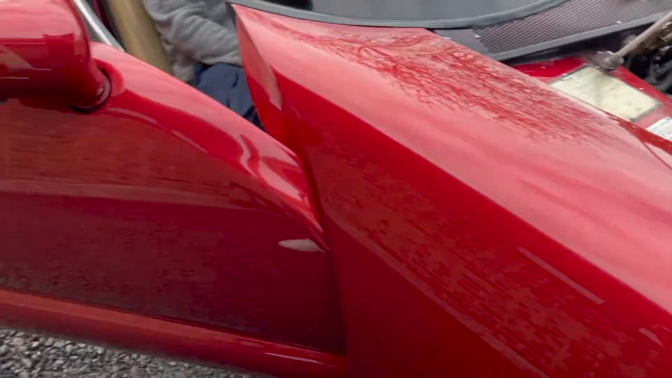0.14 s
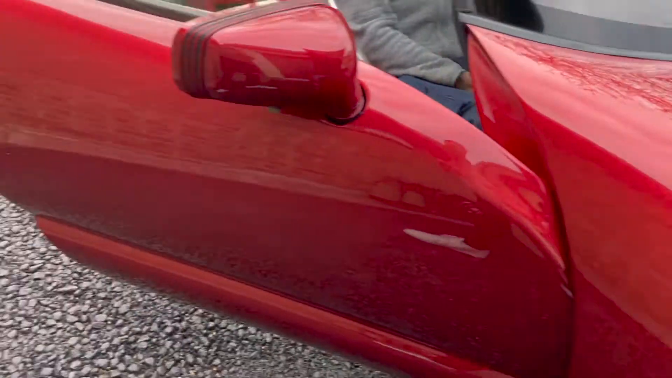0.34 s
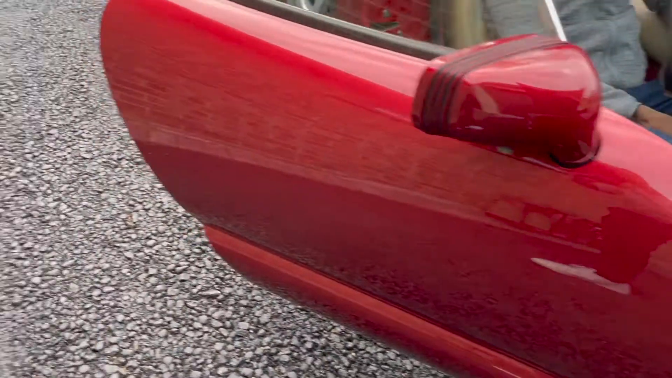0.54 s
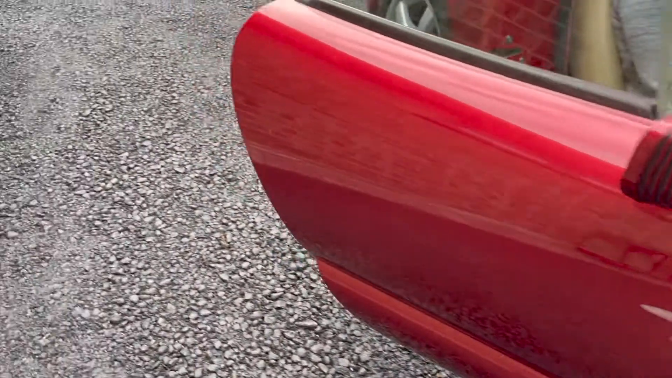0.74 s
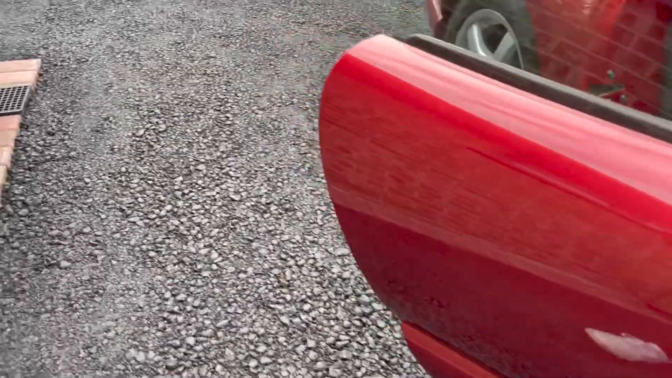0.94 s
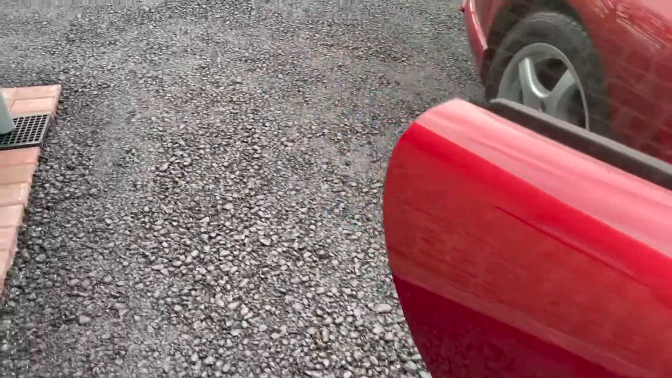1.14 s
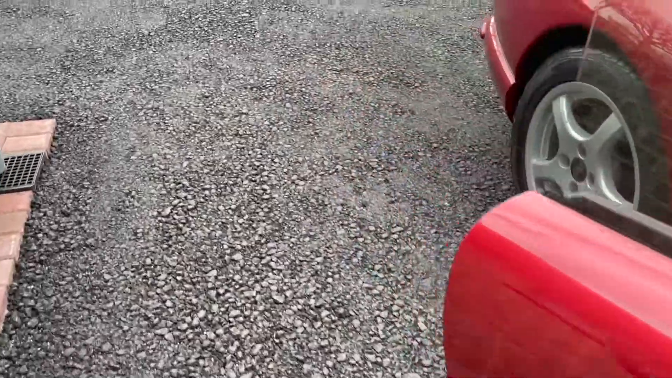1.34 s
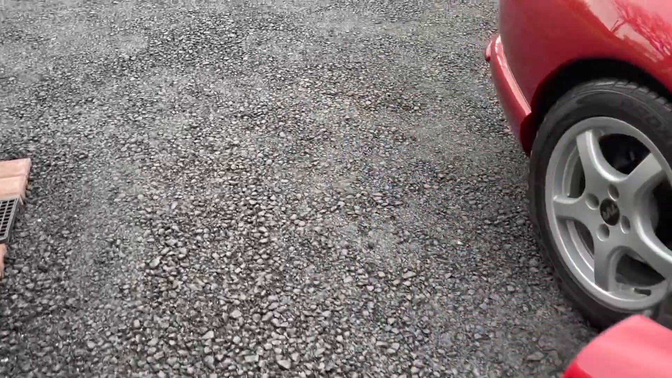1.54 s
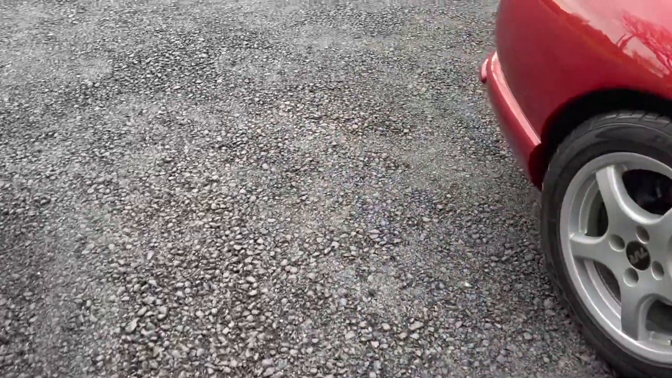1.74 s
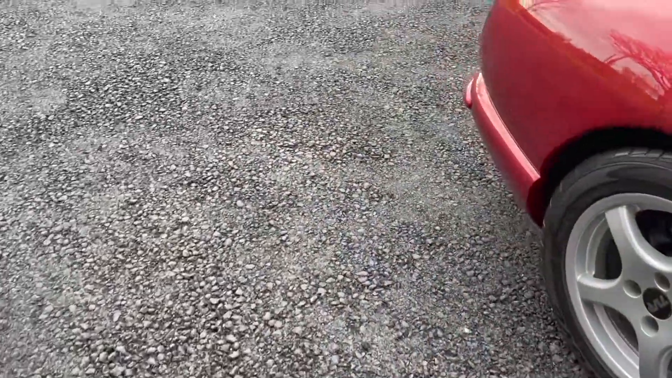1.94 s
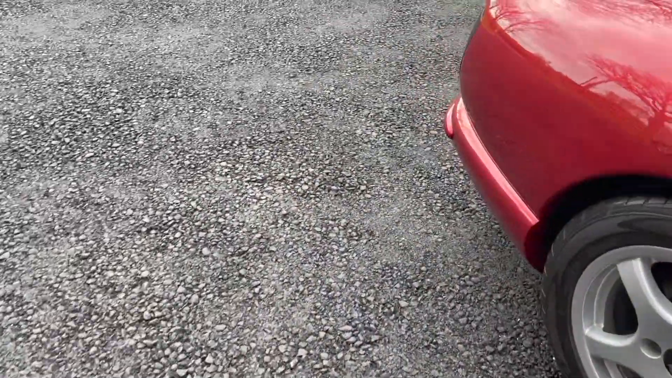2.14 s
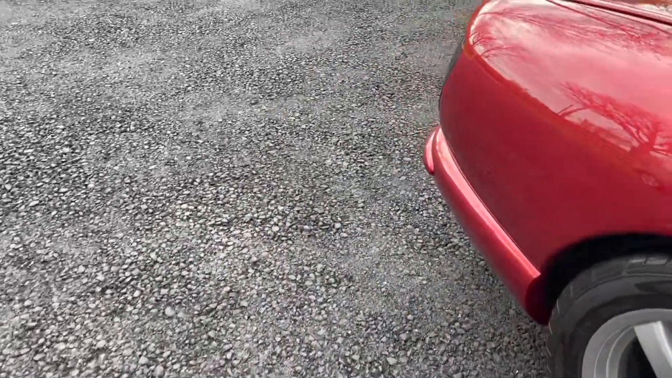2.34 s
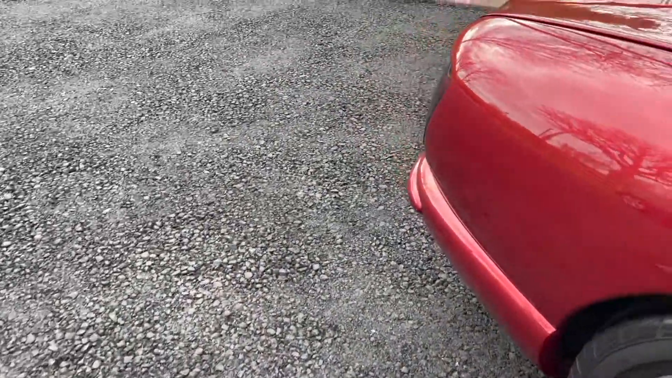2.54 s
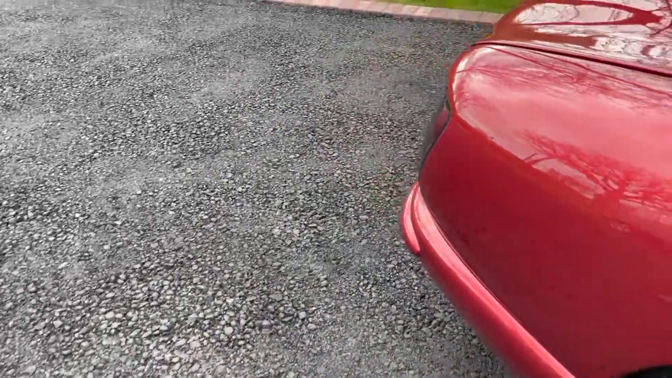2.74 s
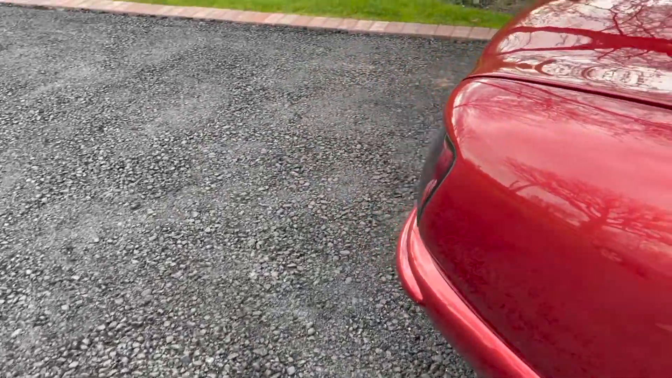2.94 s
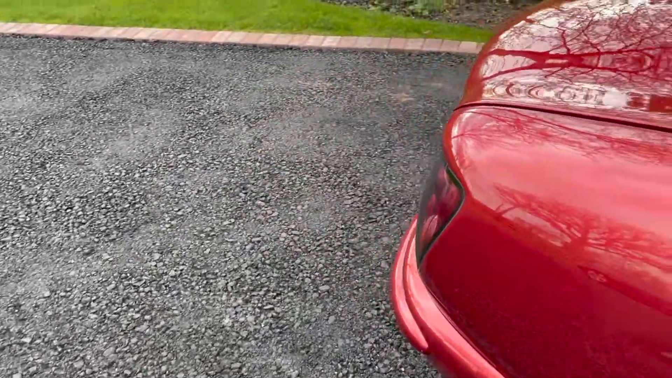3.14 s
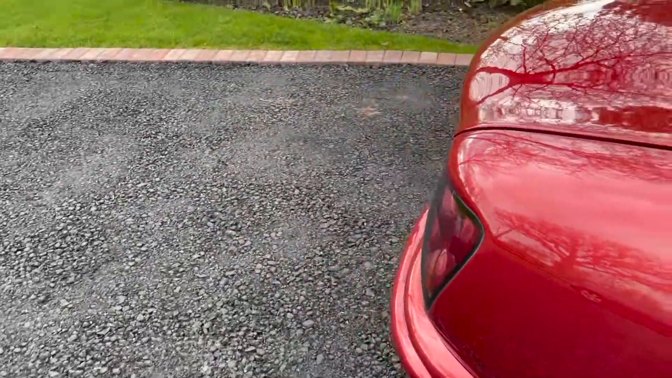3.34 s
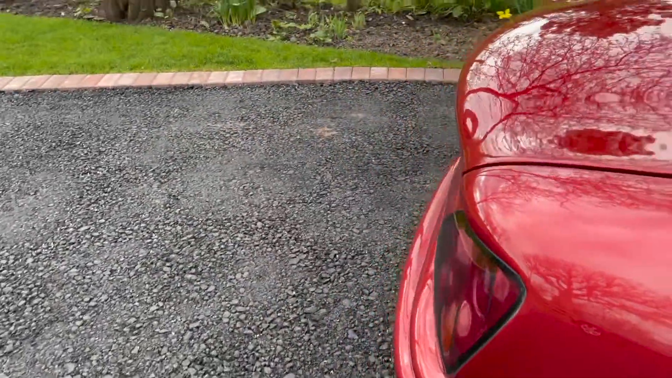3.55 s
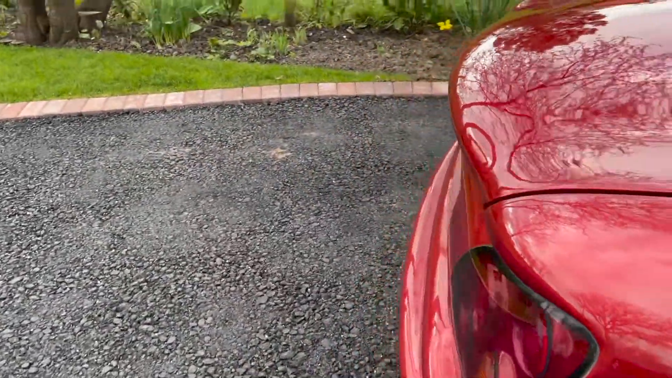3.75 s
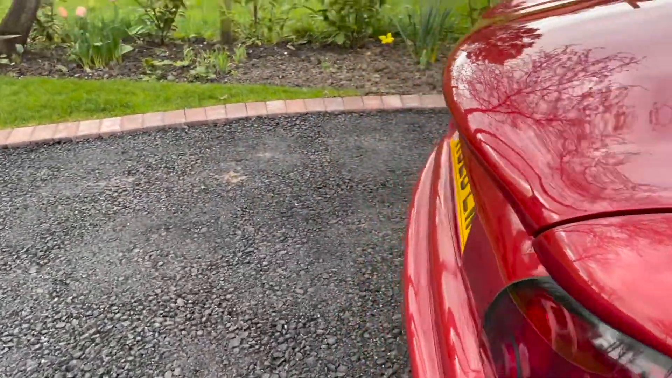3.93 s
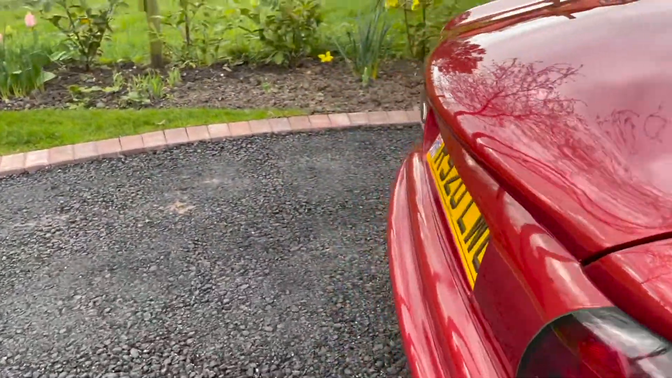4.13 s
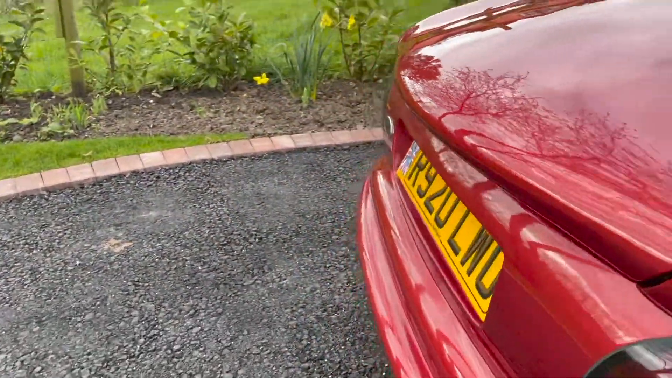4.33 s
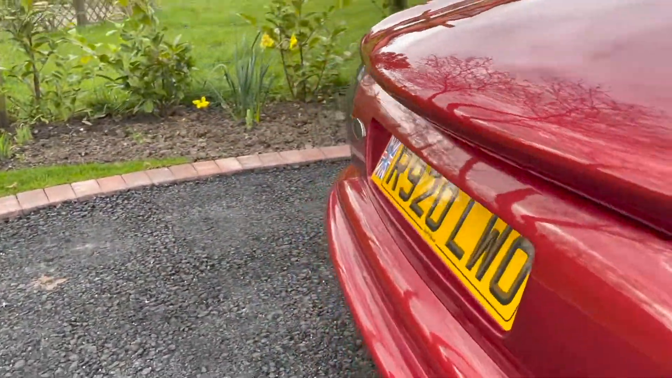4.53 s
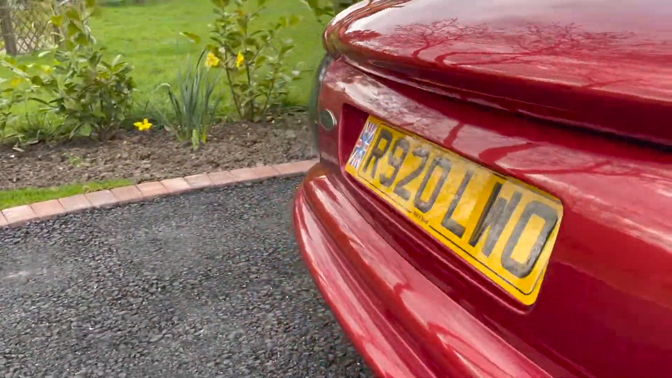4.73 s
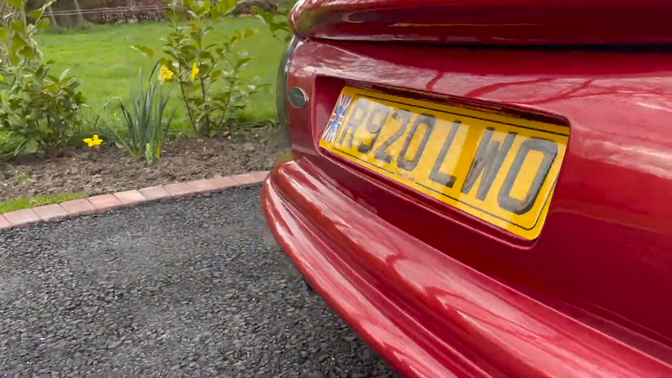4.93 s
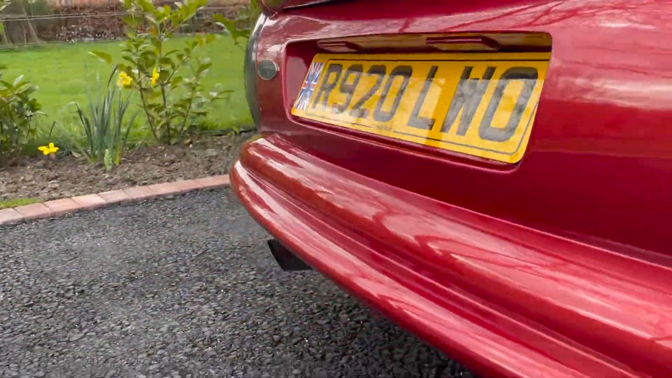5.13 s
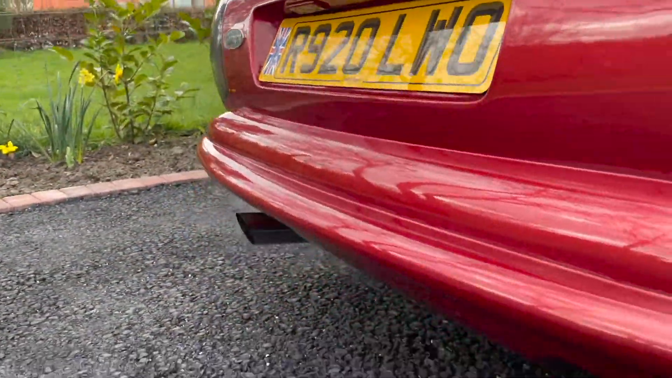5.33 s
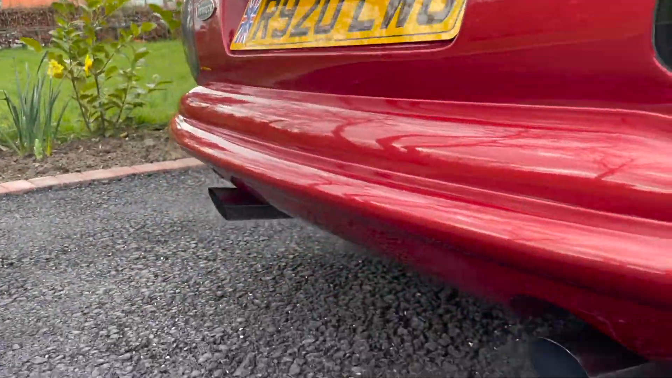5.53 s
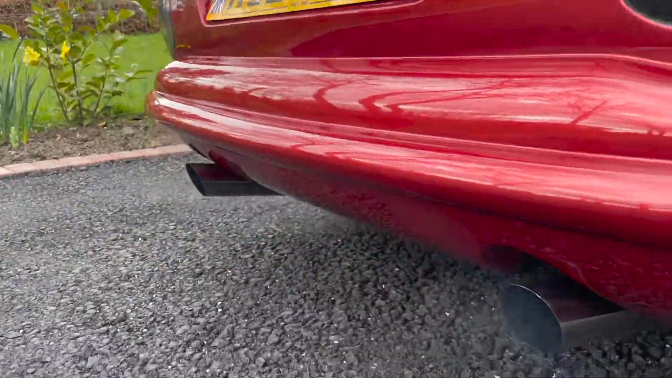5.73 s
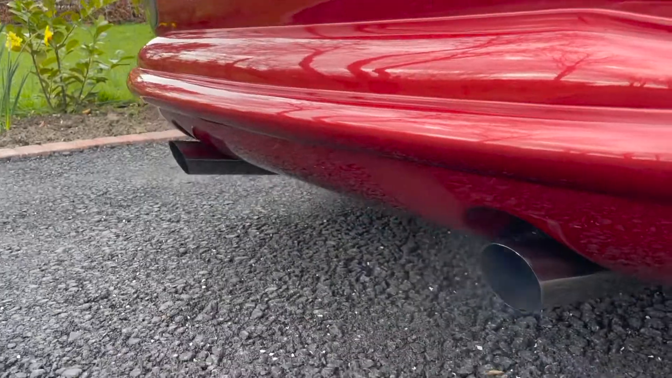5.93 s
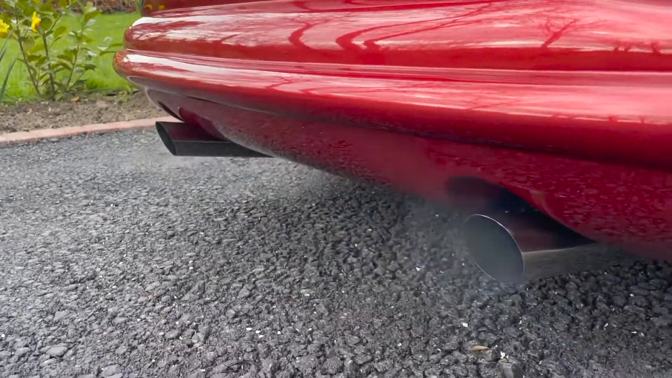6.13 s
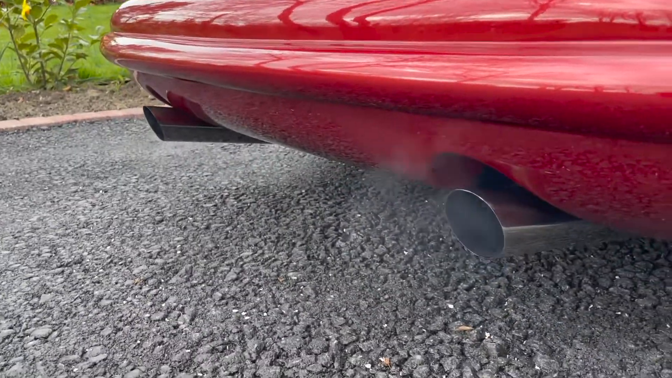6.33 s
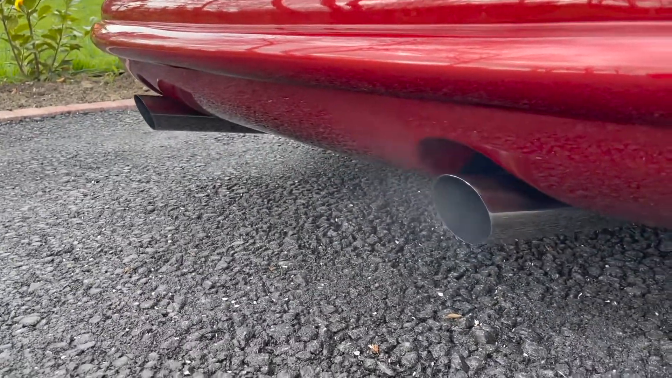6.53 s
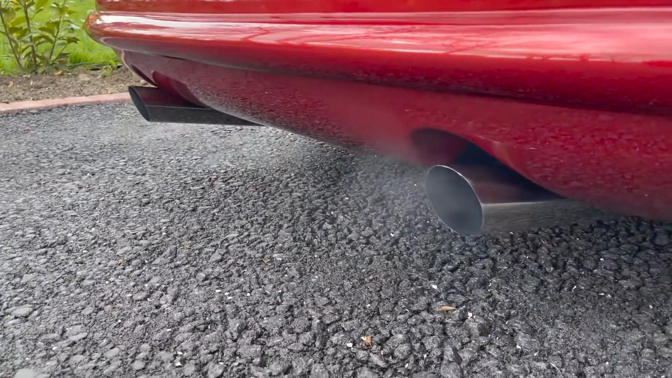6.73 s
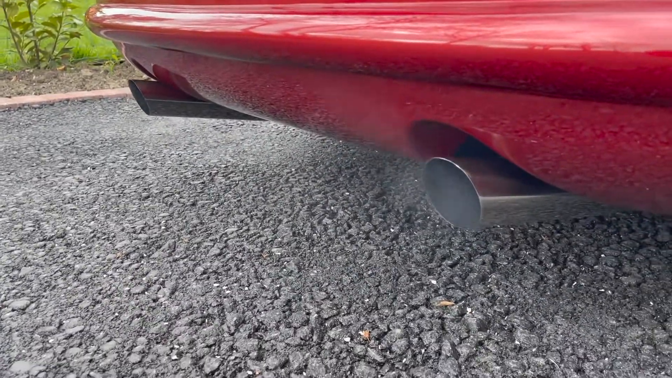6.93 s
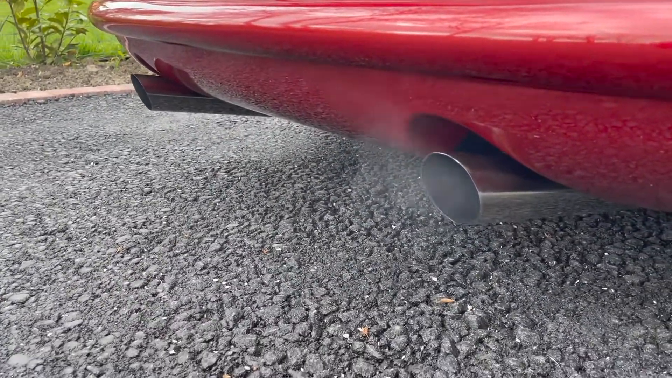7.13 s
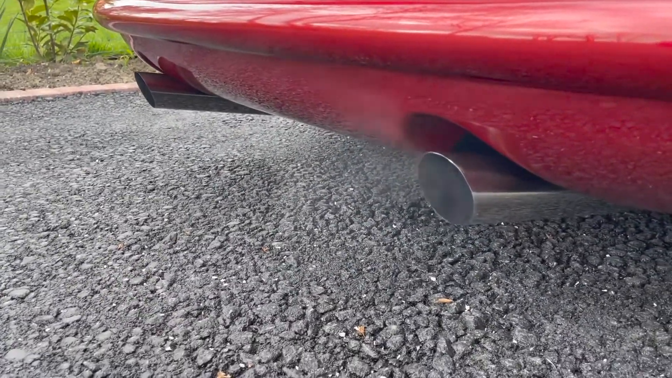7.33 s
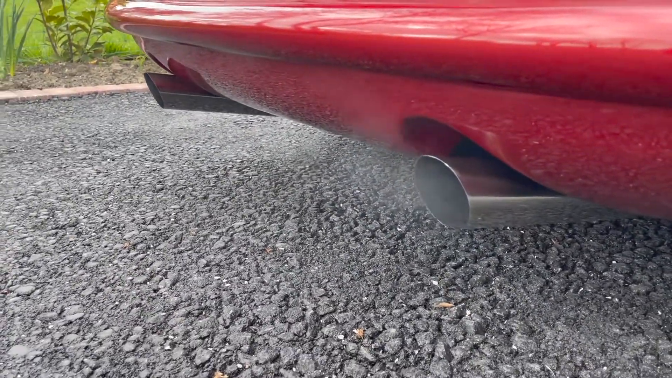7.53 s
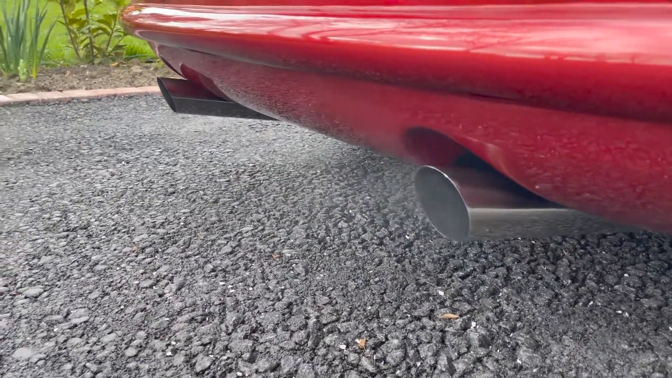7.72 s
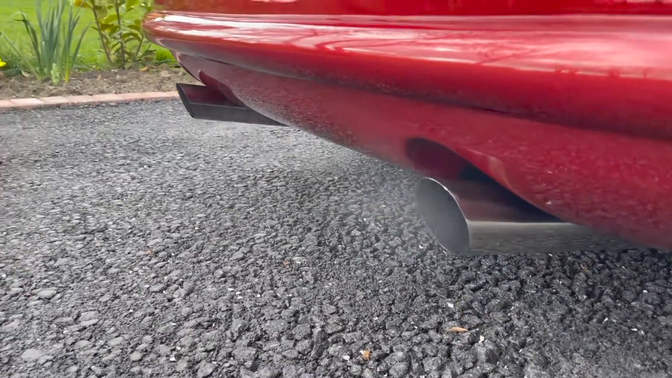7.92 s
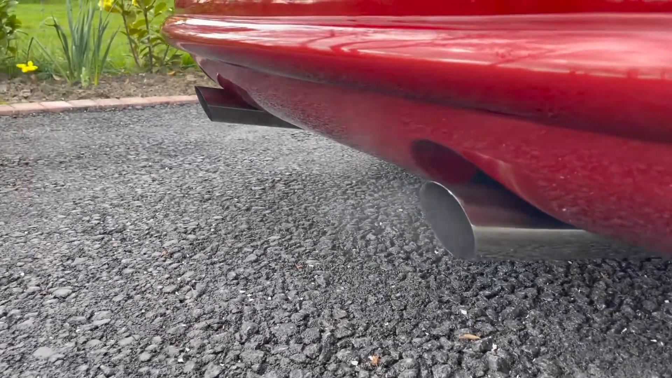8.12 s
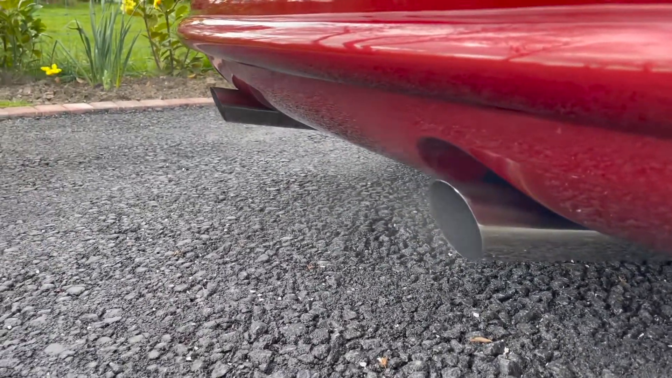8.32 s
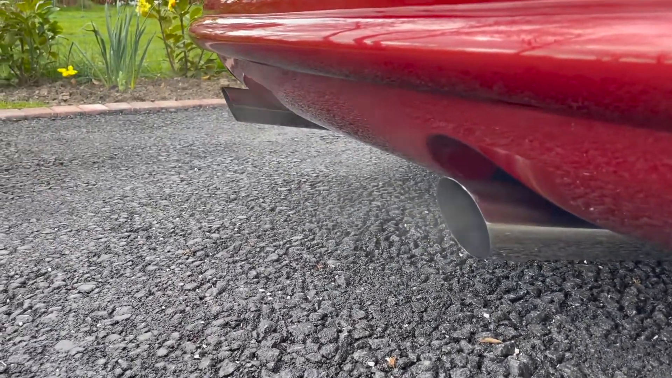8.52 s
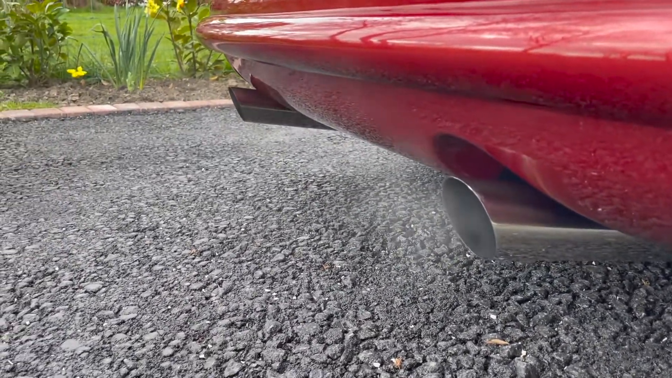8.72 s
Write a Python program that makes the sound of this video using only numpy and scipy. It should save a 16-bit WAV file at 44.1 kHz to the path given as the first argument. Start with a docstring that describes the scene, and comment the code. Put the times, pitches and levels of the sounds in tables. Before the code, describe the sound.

A big V8 idles fast and lumpy, its engine hiss fading as the deep exhaust burble grows louder and closer.

```python
"""On a drive, a V8 idles fast and lumpy while the listener walks from the open engine bay along the
flank to the tailpipes. Belts, fan and valve gear hiss and tick under ringing covers, fading as the
exhaust burble grows; grit crunches underfoot midway. The burble comes from eight cylinders of unequal
strength and lag, whose pulses shake the panels, blow the open pipes and ring the silencer chambers."""
import sys
import numpy as np
from scipy import signal
from scipy.fft import rfft, irfft, next_fast_len
from scipy.io import wavfile
from scipy.ndimage import uniform_filter1d, minimum_filter1d

SR = 44100
rng = np.random.default_rng(int(sys.argv[2]) if len(sys.argv) > 2 else 0)


def output_pcm(signal):
    """Save a mono or channel-first signal as 16-bit PCM at the path in sys.argv[1].

    Samples are clipped to [-1, 1] before scaling.
    """
    pcm = np.clip(np.atleast_2d(signal).T, -1, 1) * 32767
    wavfile.write(sys.argv[1], SR, np.round(pcm).astype(np.int16))


N = 391166
PADDED = next_fast_len(N)   # length of the frequency-domain filters
TIME = np.arange(N) / SR


def from_db(db):
    """Decibels to gain."""
    return 10 ** (np.asarray(db) / 20)


def rms_one(x):
    """Scaled to unit power."""
    return x / np.sqrt(np.mean(x ** 2) + 1e-20)


def in_time(rows):
    """Each column of an automation table, per sample."""
    seconds, *columns = np.transpose(rows)
    return [np.interp(TIME, seconds, c) for c in columns]


def over_hz(rows):
    """Each column of a spectrum table, per frequency bin."""
    hz, *columns = np.transpose(rows)
    bin_hz = np.arange(1, PADDED // 2 + 2) * SR / PADDED
    return [np.interp(np.log(bin_hz), np.log(hz), c) for c in columns]


def drift(rate_hz):
    """A slow random wander of spread 1, drawn at every 40th sample."""
    r = np.exp(-80 * np.pi * rate_hz / SR)
    slow = signal.lfilter([1], [1, -2 * r, r * r], rng.standard_normal(N // 40 + 2002))[2000:]
    return np.interp(np.arange(N) / 40, np.arange(len(slow)), rms_one(slow))


def noise(spectrum):
    """Two unrelated noises of the given colour."""
    white = rfft(rng.standard_normal((2, PADDED)))
    return rms_one(irfft(white * from_db(over_hz(spectrum)[0]), PADDED)[:, :N])


def resonate(x, hz, width_hz):
    """One resonance with gain 1 at its peak."""
    r = np.exp(-np.pi * width_hz / SR)
    feedback = [1, -2 * r * np.cos(2 * np.pi * hz / SR), r * r]
    return signal.lfilter([(1 - r * r) / 2, 0, (r * r - 1) / 2], feedback, x)


def ring(x, hz, width_hz, skirt_hz=None):
    """A resonance at unit power, its skirts steepened by a second, wider one."""
    return rms_one(resonate(resonate(x, hz, width_hz), hz, skirt_hz or 2 * width_hz))


def modes(x, table, waver_db=0.0, sign=-1):
    """Parallel rings, by default alternating in sign; each may swell and fade on its own."""
    rings = [sign ** k * from_db(db) * ring(x, hz, width) for k, (hz, width, db) in enumerate(table)]
    return rms_one(sum(r * from_db(waver_db * drift(0.89)) if waver_db else r for r in rings))


def flecks(per_s, table):
    """Uneven ticks, each ringing a single resonance of the table."""
    ticks = (rng.random(N) < per_s / SR) * rng.standard_normal(N) + .02 * rng.standard_normal(N)
    dealt = rng.integers(0, len(table), N)
    return rms_one(sum(from_db(db) * ring(ticks * (dealt == k), hz, width)
                       for k, (hz, width, db) in enumerate(table)))


def puffs(pulses, fall_ms):
    """Gas flow after each firing: a quick rise, a slower fall."""
    r = np.exp(-1000 / (fall_ms * SR))
    return rms_one(signal.lfilter([1], [1, -2 * r, r * r], pulses))


# The rumble's colour. Each row: frequency in Hz, relative level in dB.
RUMBLE_COLOUR = [(12, -20), (20, -5), (30, -5), (42, 0), (62, 0), (80, -6), (100, -9), (140, -60)]
# Its fader. Each row: time in seconds, level in dB.
RUMBLE_FADER = [(0.0, -34), (1.6, -47), (2.9, -35), (5.2, -31.5), (8.87, -34)]

def rumble():
    """A bed of deep noise that heaves at random."""
    return from_db(in_time(RUMBLE_FADER)[0] + 2.0 * drift(3.0)) * noise(RUMBLE_COLOUR)


# The hum's band. Its row: pitch in Hz, width in Hz, relative level in dB.
HUM_BAND = [(595, 53, 0)]
# Its fader. Each row: time in seconds, level in dB.
HUM_FADER = [(0, -46), (.45, -50), (.7, -43), (1.7, -44), (2.2, -49), (4.6, -52.5), (5.4, -46.5),
             (8.87, -48.5)]

def bay_hum():
    """A narrow band of noise hums in the bay."""
    return from_db(in_time(HUM_FADER)[0]) * modes(rng.standard_normal((2, N)), HUM_BAND)


# Shoe drags. Each row: centre in seconds, spread in seconds, level in dB.
SCUFFS = [(3.78, 0.16, -46), (4.05, 0.088, -58), (4.33, 0.12, -49)]

def scuff():
    """Small stones grind under the sole: short bright rings that swell and fade."""
    strokes = sum(from_db(db) * np.exp(-.5 * ((TIME - s) / spread) ** 2) for s, spread, db in SCUFFS)
    stones = [(hz, 250.0, 0) for hz in np.geomspace(2800, 7000, 8)]
    return strokes * flecks(per_s=600 * from_db(5.0 * drift(10.0)), table=stones)


# Stones underfoot. Each row: start in seconds, peak before panning in dB, pitch in Hz.
STONE_CRACKS = [(2.931, -29, 900), (3.697, -31, 700), (3.936, -28, 750), (4.023, -22, 640),
                (4.044, -25, 880), (4.066, -21, 560)]

def grit():
    """Each stone cracks: a sharp tick and a short dull ring."""
    out = np.zeros(N)
    click = signal.unit_impulse(SR // 40)
    for start, peak_db, hz in STONE_CRACKS:
        crack = ring(click, hz, 320.0, 1200.0) + .3 * ring(click, 1700.0, 1200.0, 1500.0)
        at = round(start * SR)
        out[at:at + len(click)] += from_db(peak_db) * crack / np.abs(crack).max()
    return out


# Valve cover rings. Each row: pitch in Hz, width in Hz, relative level in dB.
VALVE_COVERS = [(2050, 90, -4), (2250, 90, -5), (2500, 120, -6), (2750, 100, -4), (2950, 100, 0),
                (3120, 100, 0), (3400, 160, -5)]
# The rasp's fader. Each row: time in seconds, level in dB.
RASP_FADER = [(0, -36), (.2, -43), (.4, -45), (1.0, -47.5), (2.5, -48), (3.2, -69), (4.5, -59.5),
              (6.4, -57), (8.87, -55)]

def valve_rasp(crank):
    """Valve gear ticks against its covers, bunching up once an engine cycle."""
    ticks_per_s = 800 * from_db(4.0 * np.cos(2 * np.pi * (crank - .65)))
    return from_db(in_time(RASP_FADER)[0]) * flecks(ticks_per_s, VALVE_COVERS)


# The hiss and its airy top. Each row: frequency in Hz, relative level in dB.
HISS_COLOUR = [(300, -29.5), (700, 3), (1300, -5), (2000, -5.5), (3000, -6.5), (4500, -5.5), (6500, -8.5),
               (8000, -20.5), (10000, -11), (12500, -18)]
HISS_AIR = [(14000, -21), (16000, -19)]
# Engine cover rings. Each row: pitch in Hz, width in Hz, relative level in dB.
BAY_COVERS = [(1150, 25, -14), (1400, 95, -9), (1600, 90, -11), (1715, 40, -13), (2200, 22, -14),
              (2640, 70, -12), (2990, 450, -1), (3170, 60, -14), (3500, 200, -8), (3780, 70, -12),
              (5000, 500, -11)]
# Brightness along the walk. Each row: time in seconds, lift of the top band in dB.
TREBLE_LIFT = [(0, 6.5), (1.3, 3.5), (2.8, 3), (4.3, 5), (5.2, 1.5), (8.87, 2)]

def engine_bay(crank, pulses):
    """Belts, fan and valve gear hiss in ringing covers; bands flicker, the upper ones swell each cycle."""
    tappets = (rng.random(N) < 100 / SR) * rng.standard_normal(N)
    shaking = rng.standard_normal((2, N)) + 0.41 * rms_one(tappets)
    hiss = noise(HISS_COLOUR + HISS_AIR)
    hiss += from_db(-4.0) * modes(shaking, BAY_COVERS, waver_db=1.3, sign=1)
    swell_db = 0.41 * np.cos(2 * np.pi * (crank - .65)) + 0.93 * drift(10.0)
    treble_db = in_time(TREBLE_LIFT)[0]
    out, edges_hz = 0, [200, 1400, 2800, 5600, 8500, 19500]
    for k, band_hz in enumerate(zip(edges_hz, edges_hz[1:])):
        band = signal.sosfilt(signal.butter(2, band_hz, "band", fs=SR, output="sos"), hiss)
        band_db = swell_db * min(k / 2, 1) + .5 * drift(15.0) + treble_db * max(k - 2, 0) / 2
        out = out + (-1) ** k * band * from_db(band_db)
    return rms_one(out * (1 + 0.045 * puffs(pulses, fall_ms=1.8)))


# Open pipe overtones. Each row: pitch in Hz, width in Hz, relative level in dB.
PIPE_OVERTONES = [(315, 20, -2), (367, 16, -4), (408, 26, -2), (465, 18, -5), (555, 20, -12),
                  (760, 20, -16), (830, 40, -12), (890, 25, -13), (945, 30, -13), (1042, 40, -15)]
# The colour of rushing gas. Each row: frequency in Hz, relative level in dB.
RUSH_COLOUR = [(170, -21), (250, -20), (350, -21), (520, -15.5), (700, -19), (900, -19), (1200, -33),
               (1700, -30), (2500, -61)]

def gas_flow(pulses, mouth_db, bay_db):
    """Pulses and turbulence blow the open pipes; gas rushes out of them and into the engine."""
    flow = 1 + 0.1 * puffs(pulses, fall_ms=1.5)
    blown = rms_one(pulses) + 1.1 * rms_one(rng.standard_normal((2, N)) * flow)
    outlet, intake = from_db(mouth_db - 7), from_db(bay_db - 5)
    rush = np.hypot(outlet, intake) * rms_one(noise(RUSH_COLOUR) * flow)
    return from_db(mouth_db) * modes(blown, PIPE_OVERTONES) + rush


# Narrow rings of body and pipes. Each row: pitch in Hz, width in Hz.
BODY_RINGS = [(256, 14), (315, 13), (460, 20), (656, 10)]
# Their faders. Each row: time in seconds, then each ring's level in dB.
BODY_FADERS = [(0, -56, -49, -52, -60), (.6, -35, -44.5, -57, -56), (1.2, -37.5, -43.5, -53, -69),
               (1.9, -34.5, -43, -54, -54), (2.4, -38, -61, -40, -47), (3.0, -39.5, -52, -60, -51),
               (3.6, -46, -44, -58, -51), (4.2, -37.5, -41.5, -52, -49), (5.2, -42.5, -30.5, -48, -44),
               (6.1, -38.5, -44.5, -50.5, -55.5), (7.2, -39, -36, -45, -54), (8.0, -39.5, -31, -44, -49),
               (8.87, -37.5, -35.5, -48, -47)]

def body_rings(shakes):
    """The shaken car rings; each ring is heard best from its own place along the flank."""
    shaking = rms_one(shakes) + .5 * rng.standard_normal(N)
    return sum(from_db(db) * ring(shaking, hz, width)
               for (hz, width), db in zip(BODY_RINGS, in_time(BODY_FADERS)))


# Floor pan and sill booms. Each row: pitch in Hz, width in Hz, relative level in dB.
FLOOR_PAN = [(97.86, 6.8, 1), (119.6, 19, -2)]
SILLS = [(198, 28, -2), (220, 22, 0), (298, 24, -9)]

def panels(crank, pulses, shakes, floor_db, sill_db):
    """Firings drum on the floor pan and sills; the headers next to a sill shake it most."""
    floor = from_db(floor_db) * modes(2 * pulses + shakes, FLOOR_PAN)
    nearest = shakes * from_db(9.0 * np.cos(2 * np.pi * (crank + .08)))
    return floor + from_db(sill_db) * modes(nearest, SILLS)


# The hunting idle. Each row: time in seconds, firings per second.
IDLE_SPEED = [(0.0, 71.66), (0.12, 75.91), (0.5, 78.63), (0.75, 73.96), (1.12, 76.87), (1.37, 75.42),
              (2.12, 78.34), (2.37, 75.64), (3.12, 73.85), (3.5, 79.14), (3.75, 79.88), (3.87, 76.58),
              (4.25, 76.15), (4.5, 78.67), (5.0, 78.67), (5.5, 76.85), (5.62, 74.37), (6.25, 79.02),
              (6.87, 75.9), (7.25, 79.25), (7.75, 79.47), (7.87, 81.12), (8.37, 80.8), (8.87, 77.18)]

def crank_position(lead_ms=0.0):
    """Position in engine cycles of eight firings, optionally a moment ahead."""
    cycle_hz = in_time(IDLE_SPEED)[0] / 8
    return -.046 + np.cumsum(cycle_hz) / SR + cycle_hz * lead_ms / 1000


def drone(multiple):
    """A bass tone at a multiple of the cycle rate, a little unsteady in level."""
    phase = 2 * np.pi * multiple * crank_position(lead_ms=2.1)
    return np.sqrt(2) * np.cos(phase) * from_db(.8 * drift(8.0))


# The growl's fader. Each row: time in seconds, level in dB.
GROWL_FADER = [(0, -50), (4.2, -40), (5.2, -23), (8.87, -24)]

def growl():
    """A tone just above the firing rate, heard near the pipes."""
    return from_db(in_time(GROWL_FADER)[0]) * drone(multiple=10)


# Tailpipe tones. Each row: multiple of the cycle rate, level in dB relative to the silencer's.
THROAT_TONES = [(19, -30), (21, -27), (32, -33)]

def throat(crank):
    """Clean overtones that follow the engine speed, each pulsing on its own."""
    out = 0
    for multiple, db in THROAT_TONES:
        level = np.sqrt(2) * from_db(db + 4.0 * drift(5.0))
        out = out + level * np.cos(2 * np.pi * (multiple * crank + rng.random()))
    return out


# Cylinders in firing order. Each row: strength in dB, lag through its header in ms.
CYLINDERS = [(-11.3, 0.26), (-6.0, -0.12), (-7.8, 0.46), (-4.9, 5.01), (-4.9, 1.68), (0.0, -0.2),
             (-8.7, 4.96), (-8.6, -1.28)]

def firings(crank, uneven_db, uneven_ms):
    """A click for every firing, with its cylinder's strength and lag, plus chance: the lumpy beat."""
    count = np.arange(int(crank[-1] * 8))
    strength_db, lag_ms = np.array(CYLINDERS)[count % 8].T
    slip, kick = rng.standard_normal((len(count), 2)).T
    at = np.interp(count / 8, crank, np.arange(N)) + (lag_ms + uneven_ms * slip) * SR / 1000
    return np.bincount(np.clip(at, 0, N - 1).astype(int), from_db(strength_db + uneven_db * kick), N)


# Silencer chambers. Each row: cold pitch in Hz, warm pitch in Hz, width in Hz.
CHAMBERS = [(127, 129, 15), (149, 152, 16)]
WARMING_FROM_S, WARM_AT_S = 4.5, 7.0

def silencer(pulses):
    """Pulses ring through the chambers in turn; the pitch rises a little as the gas warms."""
    cold, warm = pulses, pulses
    for cold_hz, warm_hz, width_hz in CHAMBERS:
        cold, warm = resonate(cold, cold_hz, width_hz), resonate(warm, warm_hz, width_hz)
    burble = cold + np.interp(TIME, [WARMING_FROM_S, WARM_AT_S], [0, 1]) * (warm - cold)
    power = uniform_filter1d(uniform_filter1d(burble ** 2, size=SR // 10), size=SR // 10)
    return burble / np.sqrt(power)   # evens the level over about one engine cycle


# The stereo image in bass and mids. Each row: frequency in Hz, left over right in dB,
# left lead in turns, share of unrelated sound from 0 to 1.
BASS_IMAGE = [(30, .3, .05, .45), (78, 1.8, .082, .1), (150, 4.5, .087, .1), (260, 5, .07, .3)]
MID_IMAGE = [(432, 1, 0.13, 0.16), (890, -1, -0.16, 0.16), (1460, -4.5, -0.11, 0.4),
             (2240, -0.5, -0.14, 0.6), (2820, -3.5, 0.18, 0.23), (5200, -2.5, 0.00044, 0.3),
             (7130, -6, 0.074, 0.9)]
# Above about 7.6 kHz, left and right fall in and out of step, band by band. Same columns.
TREBLE_IMAGE = [(7650, 0, -.5, 0), (8900, 0, -.5, .1), (11000, 0, -1, .1), (12500, 0, -1, .1),
                (14100, 0, -1.5, 0)]
PAN_TOP_HZ = 7000   # panning leaves the treble above this alone

def stereo(sound, diffuse, pan_db):
    """Spreads a sound left and right with a level and phase gap, plus a share of diffuse sound."""
    gap_db, turns, share = over_hz(BASS_IMAGE + MID_IMAGE + TREBLE_IMAGE)
    side = np.array([[1], [-1]])
    common = np.sqrt(1 - share / 2) * rfft(sound, PADDED)
    spread = side * np.sqrt(share / 2) * rfft(diffuse, PADDED)
    heard = (common + spread) * from_db(side * gap_db / 2) * np.exp(1j * np.pi * side * turns)
    low = np.arange(PADDED // 2 + 1) * SR / PADDED < PAN_TOP_HZ
    panned = irfft(heard * low, PADDED)[:, :N] * from_db(side * pan_db / 2)
    return panned + irfft(heard * ~low, PADDED)[:, :N]


# The mix along the walk. Each row: time in seconds, then in dB the levels of pipe mouth,
# sills, floor pan and engine bay, and the bay's pan to the left.
WALK_MIX = [(0.0, -58, -22, -27.5, -30.5, 7), (0.1, -45, -29, -17, -31, 6.5),
            (0.3, -38.5, -28.5, -23, -34.5, 6.5), (0.55, -39.5, -25.5, -26.5, -36.5, 8),
            (0.9, -39.5, -25, -24.5, -38.5, 8.5), (1.5, -40, -29.5, -18.5, -39.5, 8.5),
            (2.3, -40.5, -35, -26, -42, 9.5), (2.9, -39, -33.5, -14.5, -41.5, 9.5),
            (3.55, -39, -27.5, -25, -41.5, 9.5), (4.2, -41.5, -29.5, -17, -40, 7.5),
            (5.0, -37, -27, -29, -40, 8.5), (5.75, -31.5, -29.5, -34.5, -38.5, 6),
            (6.9, -31, -31, -37.5, -40, 6), (8.87, -32, -29.5, -41, -40.5, 6.5)]
# Closing in on the pipes. Each row: time in seconds, then in dB drone, tailpipe, pan to the left.
EXHAUST_MIX = [(0.0, -25.5, -20, -.5), (0.35, -20.5, -21.5, -1), (0.8, -21, -22, -.5), (1.5, -23, -20, .5),
               (2.3, -26, -16, -1), (2.9, -23.5, -13.5, -1.5), (3.55, -16, -12, -2), (4.2, -16, -10.5, -.3),
               (5.0, -14.5, -8, -.3), (5.75, -15, -6.3, -.5), (6.2, -14, -7.3, 0), (6.9, -14.5, -7.3, 1),
               (7.9, -13.5, -8.7, 1.4), (8.87, -14.5, -8.2, 1.7)]

def scene():
    """One crank drives exhaust and engine bay, each heard from its own side."""
    mouth_db, sill_db, floor_db, bay_db, bay_pan_db = in_time(WALK_MIX)
    drone_db, pipe_db, exhaust_pan_db = in_time(EXHAUST_MIX)
    crank = crank_position()
    pulses = firings(crank, uneven_db=1.3, uneven_ms=.14)
    # panels rattle less evenly, firing to firing and cycle to cycle
    shakes = firings(crank, uneven_db=4.0, uneven_ms=.5) * from_db(1.5 * drift(4.0))
    throb = from_db(drone_db) * drone(multiple=8)
    throb += from_db(pipe_db) * (silencer(pulses) + throat(crank)) + growl()
    body = panels(crank, pulses, shakes, floor_db, sill_db) + body_rings(shakes)
    gas, gas_diffuse = gas_flow(pulses, mouth_db, bay_db) + rumble()
    bay, bay_diffuse = from_db(bay_db) * engine_bay(crank, pulses) + bay_hum()
    exhaust = stereo(throb + body + gas, gas_diffuse, exhaust_pan_db)
    return exhaust + stereo(bay + valve_rasp(crank) + grit() + scuff(), bay_diffuse, bay_pan_db)


SOFT_CLIP, LIMIT_DB, RELEASE_DB_PER_S, CUTOFF_HZ = 1.3, -.2, 40.0, 15720

def record(dry):
    """The microphone rounds loud peaks, a look-ahead limiter holds them down, and the top is cut."""
    rounded = SOFT_CLIP * np.tanh(dry / SOFT_CLIP)
    over_db = np.maximum(20 * np.log10(np.abs(rounded).max(axis=0) + 1e-9) - LIMIT_DB, 0)
    release_db = RELEASE_DB_PER_S * TIME
    held_db = np.maximum.accumulate(over_db + release_db) - release_db
    gain_db = uniform_filter1d(minimum_filter1d(-held_db, size=601), size=601)
    high_cut = signal.ellip(12, .5, 70, CUTOFF_HZ, fs=SR, output="sos")
    return signal.sosfilt(high_cut, rounded * from_db(gain_db))


dry = scene()
out = record(dry)
output_pcm(out)
```